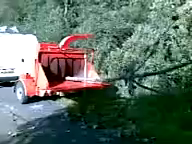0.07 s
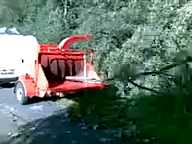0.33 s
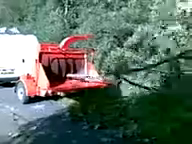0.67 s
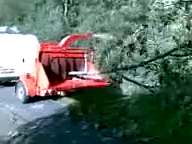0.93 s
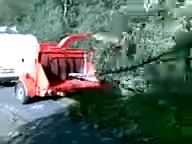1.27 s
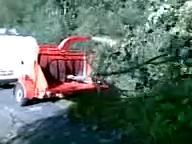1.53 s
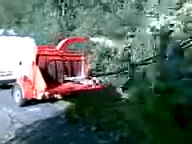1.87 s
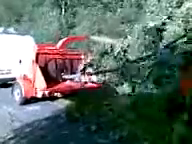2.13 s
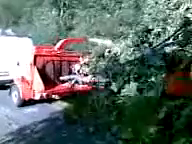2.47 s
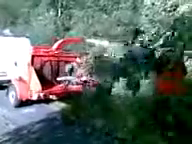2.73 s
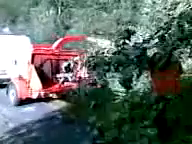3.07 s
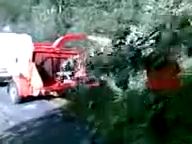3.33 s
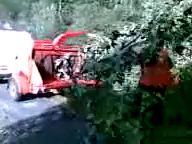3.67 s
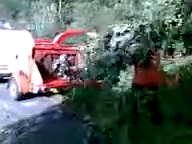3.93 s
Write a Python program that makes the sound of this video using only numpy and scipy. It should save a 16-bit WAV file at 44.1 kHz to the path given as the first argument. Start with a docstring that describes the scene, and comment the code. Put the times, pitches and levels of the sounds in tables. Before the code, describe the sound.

A wood chipper drones, then grinds loudly through a branch, with brief sound dropouts.

```python
"""A diesel wood chipper roars beside a road, its exhaust droning over a rough rumble.
A branch scrapes along the hopper; from about 1 s the knives bite in rapid bursts, the butt cracks
and booms in the drum, and chips rattle through the steel chute.
A small, narrow-band microphone is overloaded: the sound flutters and cuts out for instants."""
import sys
import numpy as np
from scipy import signal
from scipy.fft import rfft, irfft, next_fast_len
from scipy.io import wavfile
from scipy.ndimage import uniform_filter1d, map_coordinates

SR = 44100
rng = np.random.default_rng(int(sys.argv[2]) if len(sys.argv) > 2 else 0)


def waveform_to_disk(signal):
    """Save audio, clipped to [-1, 1], as 16-bit WAV at the path in sys.argv[1]."""
    frames = np.transpose(np.atleast_2d(signal))
    scaled = np.clip(frames, -1, 1) * 32767
    samples = np.round(scaled).astype(np.int16)
    wavfile.write(sys.argv[1], SR, samples)


N = 176400
TIME = np.arange(N) / SR


def amp(db):
    """Decibels to gain."""
    return 10 ** (np.asarray(db) / 20)


def unit(x):
    """Scale to rms 1."""
    return x / np.sqrt(np.mean(x ** 2) + 1e-20)


def curves(rows):
    """Automation lanes: one value per sample for each column after the time."""
    times, *columns = np.transpose(rows)
    return [np.interp(TIME, times, column) for column in columns]


def wobble(rate):
    """A smooth random curve, rate knots a second."""
    knots = rng.standard_normal(int(N * rate / SR) + 4)
    return map_coordinates(knots, [TIME * rate])


def bumps(rows, steep):
    """A sum of rounded bumps from rows (time [s], full width [s], height); steep squares them off."""
    out = np.zeros(N)
    for at, width, height in rows:
        i = np.arange(max(0, int((at - 2 * width) * SR)), min(N, int((at + 2 * width) * SR)))
        out[i] += height * .5 ** (np.abs(2 * (i / SR - at) / width) ** steep)
    return out


def filtered(x, response):
    """x through a complex frequency response."""
    size = next_fast_len(N + SR // 2)
    return irfft(rfft(x, size) * response(np.fft.rfftfreq(size, 1 / SR)), size)[:N]


def equalised(x, points):
    """x through an EQ curve (frequency [Hz], gain [dB]) drawn on a log frequency axis."""
    hz, db = np.transpose(points)
    return filtered(x, lambda f: amp(np.interp(np.log(f + 1), np.log(hz + 1), db)))


def ringing(x, modes):
    """x through resonances (frequency [Hz], width [Hz], gain [dB]), at rms 1."""
    def response(f):
        return sum(amp(db) * 1j * f * width / (hz * hz - f * f + 1j * f * width)
                   for hz, width, db in modes)
    return unit(filtered(x, response))


def patchy(x, depth_db):
    """x with drifting patches of random gain in time and frequency, at rms 1."""
    spectra = signal.stft(x, nperseg=1024)[2]
    patches = uniform_filter1d(rng.standard_normal(spectra.shape), size=5, axis=0)
    patches = uniform_filter1d(patches, size=4, axis=1)
    return unit(signal.istft(spectra * amp(depth_db * unit(patches)), nperseg=1024)[1][:N])


def engine(firing_hz, load):
    """Exhaust drone and upper orders on one unsteady shaft, over a rumble throbbing with the firing."""
    # exhaust drone (time [s], relative firing tone level [dB], relative octave level [dB])
    drone_levels = [(0, -40.5, -58), (.6, -33, -52.5), (.85, -44, -52), (1.12, -38, -27.5),
                    (1.36, -33, -25.5), (1.78, -32.5, -27), (1.92, -22.5, -27.5), (2.35, -18, -27.5),
                    (2.6, -28, -32.5), (2.85, -28, -37), (3.15, -21.5, -27), (3.3, -28.5, -26.5),
                    (3.42, -26.5, -33), (3.72, -25, -32.5), (3.87, -18, -37.5), (4, -42, -29)]
    # upper engine orders (multiple of the firing rate, level at full load [dB])
    orders = [(3, -48.5), (6, -48), (7, -44), (8, -40), (10, -41.5), (15, -48), (20, -45)]
    # swell of the rumble (time [s], relative level [dB])
    rumble_levels = [(0, -16.5), (.15, -30.5), (.3, -26), (.55, -26.5), (.78, -34), (.95, -29.5),
                     (1.1, -21), (1.25, -21), (1.5, -25), (1.9, -22), (2.3, -20), (2.6, -21.5),
                     (2.85, -25.5), (3.0, -19.5), (3.4, -22.5), (3.55, -18.5), (3.7, -28), (4, -18)]
    # rumble spectrum (frequency [Hz], relative level [dB])
    rumble_colour = [(20, -23), (40, -15.5), (65, -6.5), (90, -0.5), (130, 0), (190, 0.5), (290, -5),
                     (400, -7.5), (700, -25)]
    drone_trim_db, rumble_trim_db = -1, 1
    phase = 2 * np.pi * np.cumsum(firing_hz * (1 + 0.00505 * wobble(25))) / SR
    firing_db, octave_db = curves(drone_levels)
    drone = amp(firing_db + 1.5 * wobble(20)) * np.sin(phase + 0.084 * wobble(40))
    octave = amp(octave_db + 2 * wobble(22)) * np.sin(2 * phase + .7 * wobble(35))
    upper = sum(amp(db + 0.99 * wobble(12)) * np.sin(order * phase + 0.34 * wobble(30))
                for order, db in orders)
    tones = np.sqrt(2) * (amp(drone_trim_db) * (drone + octave) + load * upper)
    rumble_db, = curves(rumble_levels)
    throb = patchy(rng.standard_normal(N), depth_db=2) * (1 + 0.36 * np.cos(phase))
    return tones + amp(rumble_db + rumble_trim_db) * unit(equalised(throb, rumble_colour))


def knives(firing_hz):
    """The cutting force: a bite and a short lull for each knife, geared to the engine."""
    # how distinctly the knives chop (time [s], typical lull depth [dB])
    chop = [(0, 11), (.5, 9), (.75, 15), (.95, 20.5), (1.12, 16), (1.26, 6.5), (1.45, 10.5), (1.9, 14),
            (2.25, 3), (2.7, 15), (2.88, 11.5), (3.1, 9.5), (4, 6)]
    blows_per_firing, scatter_periods = .6, 0.21
    lull_s, depth_spread = 0.0045, 0.29
    blow_count = np.cumsum(firing_hz * blows_per_firing) / SR
    late, deeper = rng.standard_normal((int(blow_count[-1]), 2)).T
    times = np.interp(np.arange(len(late)) + scatter_periods * late, blow_count, TIME)
    depths = np.maximum(0, 1 + depth_spread * deeper)
    lulls = bumps([(at, lull_s, depth) for at, depth in zip(times, depths)], steep=7.5)
    chop_db, = curves(chop)
    force = amp(-chop_db * lulls)
    return force / np.sqrt(uniform_filter1d(force ** 2, size=SR // 10))  # even power over 0.1 s


def cutter(firing_hz, load):
    """The free drum blows air; in the wood each bite tears off chips that ring the housing."""
    # cutting effort (time [s], relative level [dB])
    effort = [(0, -34), (.15, -32), (.29, -28.5), (.36, -33.5), (.48, -32.5), (.56, -28.5), (.68, -28.5),
              (.8, -38.5), (.9, -29), (.96, -21.5), (1.1, -16.5), (1.28, -14), (1.36, -16), (1.45, -17.5),
              (1.53, -15.5), (1.62, -16), (1.9, -18.5), (2.25, -15.5), (2.5, -19), (2.68, -20),
              (2.79, -14.5), (2.9, -19), (3.02, -21), (3.2, -17.5), (3.4, -22), (3.65, -18), (3.8, -19.5),
              (4, -18.5)]
    # air rush of the free drum (frequency [Hz], relative level [dB])
    air_colour = [(150, -31.5), (380, -9), (520, 2), (700, 4), (1000, 0), (1500, -11), (1950, -18),
                  (2400, -4), (2800, -13.5), (3150, -7.5), (4500, -13)]
    # tearing wood (frequency [Hz], relative level [dB])
    wood_colour = [(150, -13.5), (380, -1), (550, -0.5), (740, -1), (1100, -4.5), (1300, -4.5), (1550, -5),
                   (2050, -6.5), (2300, -5), (2700, -9), (3100, -7), (4500, -12)]
    # modes of the steel housing and chute (frequency [Hz], width [Hz], relative gain [dB])
    housing = [(715, 71, -10), (855, 29, 1), (919.5, 20, 1.5), (1032, 92, -5.5), (1168, 110, -10.5),
               (1814, 44, -8), (2840, 43, -22), (2974, 58, -24.5)]
    chips_per_s, chip_spread_db = 3000, 0.5
    air_db, tearing_db, ring_db = -0.5, 0.5, -4.5
    rush = patchy(rng.standard_normal(N), depth_db=3.5)
    air = amp(air_db) * unit(equalised(rush, air_colour))
    strikes = rng.random(N) < chips_per_s / SR
    chips = strikes * rng.standard_normal(N) * amp(chip_spread_db * rng.standard_normal(N))
    grit = patchy(rng.standard_normal(N) + 0.84 * unit(chips), depth_db=3.5)
    tearing = unit(equalised(grit, wood_colour))
    wood = amp(tearing_db) * tearing + amp(ring_db) * ringing(chips, housing)
    effort_db, = curves(effort)
    return amp(effort_db) * knives(firing_hz) * (np.sqrt(1 - load) * air + np.sqrt(load) * wood)


def hopper_scrapes():
    """The branch scrapes along the hopper on its way in and sets it ringing."""
    # scrapes (time [s], length [s], level [dB])
    scrapes = [(0.208, 0.024, -29), (0.285, 0.064, -27.5), (0.548, 0.043, -29)]
    # hollow ring of the hopper (frequency [Hz], width [Hz], relative gain [dB])
    hopper = [(405, 50, -16.5), (510, 100, -2.5), (652, 45, 8), (740, 50, -3.5), (890, 57, -21)]
    contact = bumps([(at, length, amp(db)) for at, length, db in scrapes], steep=3)
    return contact * ringing(rng.standard_normal(N), hopper)


def branch_cracks():
    """The butt of the branch splits in a few short, hard snaps."""
    # splits in the wood (time [s], peak [dB])
    cracks = [(1.1235, 6), (1.2046, 2), (1.2379, 4), (1.267, 4)]
    pitch_hz, decay_s = 864, 0.00057
    out, t = np.zeros(N), np.arange(SR // 50) / SR
    snap = np.sin(2 * np.pi * pitch_hz * t) * np.exp(-t / decay_s)
    for at, db in cracks:
        out[round(at * SR):][:len(t)] += amp(db) * snap / snap.max()
    return out


def drum_boom():
    """The thick butt slams into the drum, whose low modes boom and die away."""
    # drum modes (frequency [Hz], relative level [dB], t60 [s])
    modes = [(265.2, 2, 0.18), (344, -7, 0.13), (494, -13, 0.046)]
    # blows of the butt (time [s], gain [dB])
    slams = [(1.231, -7)]
    attack_s = 0.0069
    out, t = np.zeros(N), np.arange(SR // 2) / SR
    ring = sum(amp(db - 60 * t / t60) * np.sin(2 * np.pi * hz * t) for hz, db, t60 in modes)
    boom = ring * (1 - np.exp(-t / attack_s))
    for at, db in slams:
        out[round(at * SR):][:len(t)] += amp(db) * boom
    return out


def scene():
    """Engine and cutter share one shaft; the load comes on as the branch reaches the knives."""
    # engine speed (time [s], firing rate [Hz])
    firing = [(0, 142.8), (.7, 141.4), (1.05, 138), (1.25, 134.8), (1.75, 131.6), (2.1, 134.7),
              (2.35, 132.7), (2.55, 127.5), (2.8, 129.4), (3.2, 131.2), (3.6, 130.3), (4, 130.2)]
    bite_start_s, bite_full_s = .86, 0.99
    firing_hz, = curves(firing)
    load = np.interp(TIME, [bite_start_s, bite_full_s], [0, 1])
    machine = engine(firing_hz, load) + cutter(firing_hz, load)
    return (machine + hopper_scrapes() + branch_cracks() + drum_boom())[None]


def record(dry):
    """An overloaded, narrow-band microphone: the sound flutters, cuts out, saturates and clips."""
    # the sound cuts out (time [s], length [s], depth [dB])
    dropouts = [(.094, 0.0051, 23), (.140, .012, 4.5), (.224, 0.006, 21), (.263, 0.006, 9),
                (.353, 0.018, 37.5), (.436, 0.01, 35.5), (.728, 0.0046, 24), (.827, 0.012, 36.5),
                (.906, 0.0099, 21), (.976, 0.0099, 32.5), (1.150, 0.0063, 28), (1.180, .008, 21.5),
                (1.227, .005, 14), (1.313, 0.0066, 27), (1.344, 0.003, 15), (1.368, 0.007, 28.5),
                (1.418, 0.014, 24.5), (1.474, 0.0053, 16.5), (1.503, 0.0083, 27.5), (1.554, 0.015, 31.5),
                (1.658, 0.012, 36.5), (1.775, 0.0033, 9), (1.809, 0.0056, 24), (1.834, .006, 11.5),
                (1.853, .010, 25), (1.924, .007, 24), (2.307, .006, 11.5), (2.382, 0.0084, 11),
                (2.472, 0.0096, 12.5), (2.517, 0.0036, 27), (2.627, 0.0082, 36), (2.718, 0.011, 25),
                (2.748, 0.0092, 15.5), (2.873, 0.0085, 29), (2.927, 0.014, 29), (3.030, 0.01, 14),
                (3.297, 0.007, 11.5), (3.394, .006, 23), (3.537, 0.0089, 41), (3.601, .013, 27),
                (3.679, .017, 36.5), (3.767, .011, 41.5)]
    # microphone response (frequency [Hz], gain [dB])
    microphone = [(20, -16.5), (40, -7), (60, 1.5), (2900, -0.5), (3150, -4), (3500, -14), (4000, -24.5),
                  (4300, -35), (4550, -54.5), (4800, -120)]
    flutter_per_s, flutter_s, mean_flutter_db = 12, 0.0025, 17
    start_s, fade_in_s = .044, 0.0077
    soft_ceiling, clip_level, top_hz = .97, .71, 15800
    draws = rng.random((int(flutter_per_s * N / SR), 2))
    flutter = [(when * N / SR, flutter_s, mean_flutter_db * (.5 + depth)) for when, depth in draws]
    dips_db = np.maximum(bumps(dropouts, steep=4), bumps(flutter, steep=3))
    fade_in = np.clip((TIME - start_s) / fade_in_s, 0, 1)
    broken = dry[0] * amp(-dips_db) * fade_in
    saturated = broken / np.sqrt(1 + (broken / soft_ceiling) ** 2)
    narrow = equalised(saturated, microphone)
    clipped = np.clip(narrow, -clip_level, clip_level)
    return filtered(clipped, lambda hz: hz < top_hz)[None]


dry = scene()
out = record(dry)
waveform_to_disk(out)
```